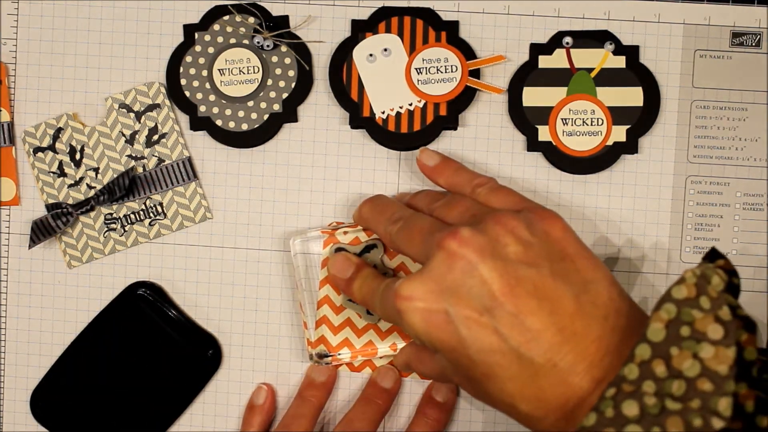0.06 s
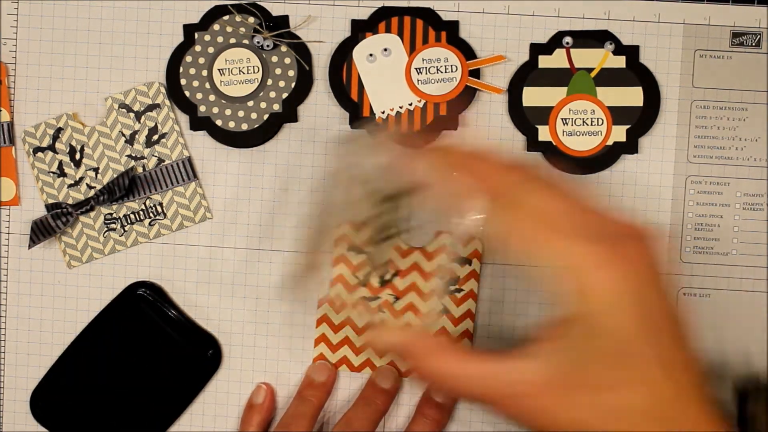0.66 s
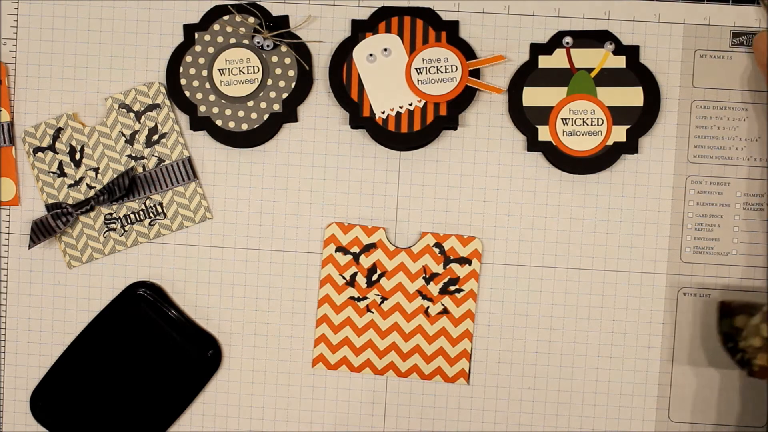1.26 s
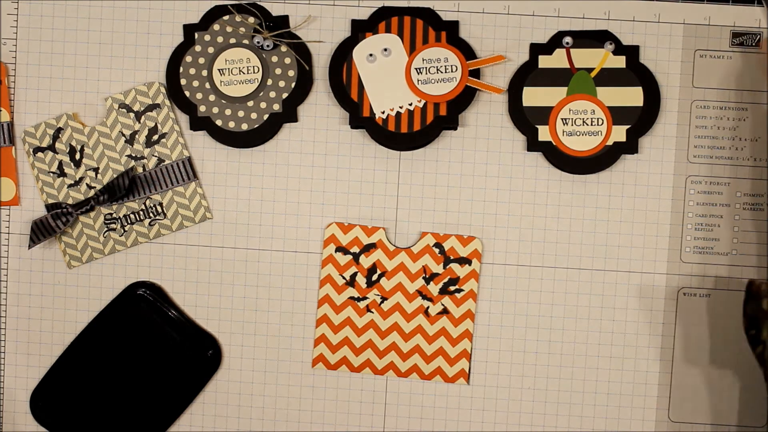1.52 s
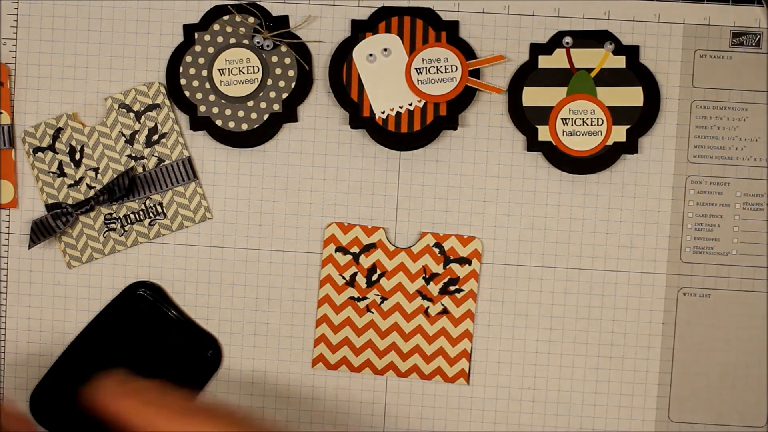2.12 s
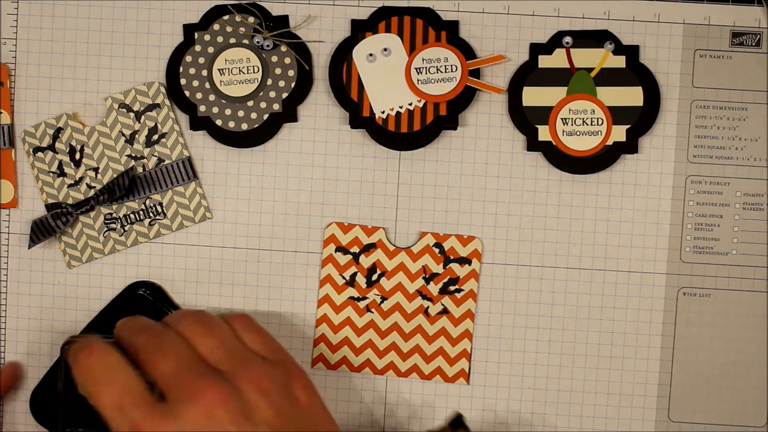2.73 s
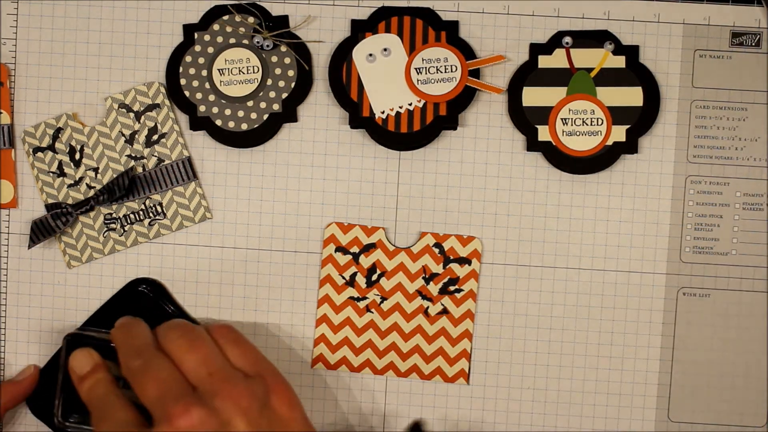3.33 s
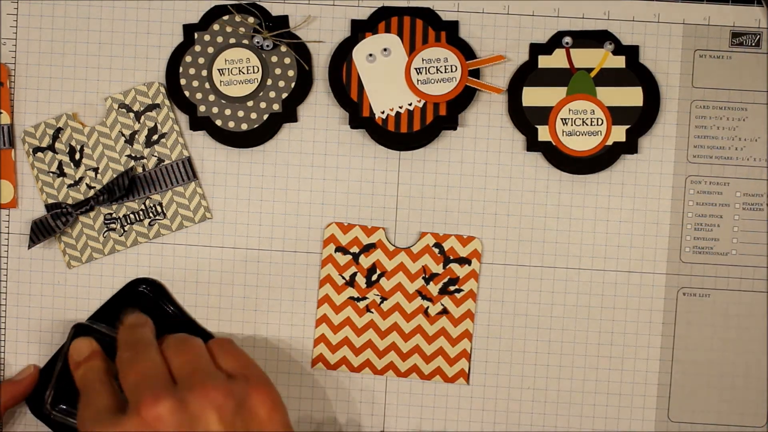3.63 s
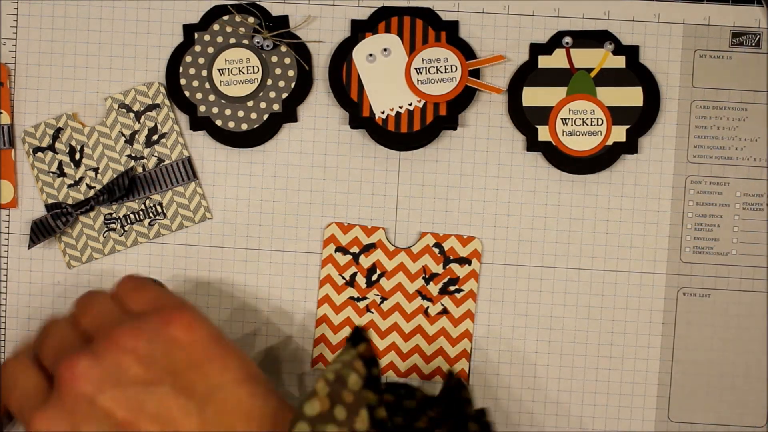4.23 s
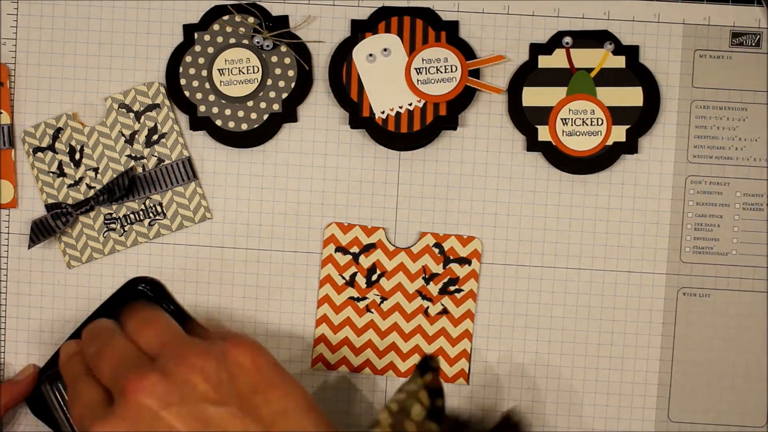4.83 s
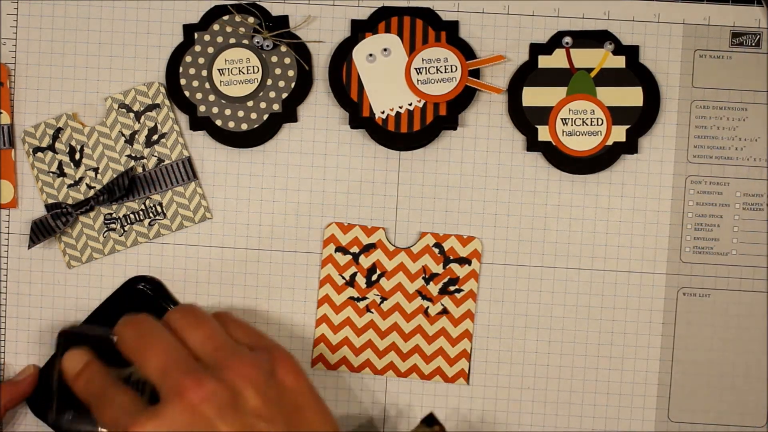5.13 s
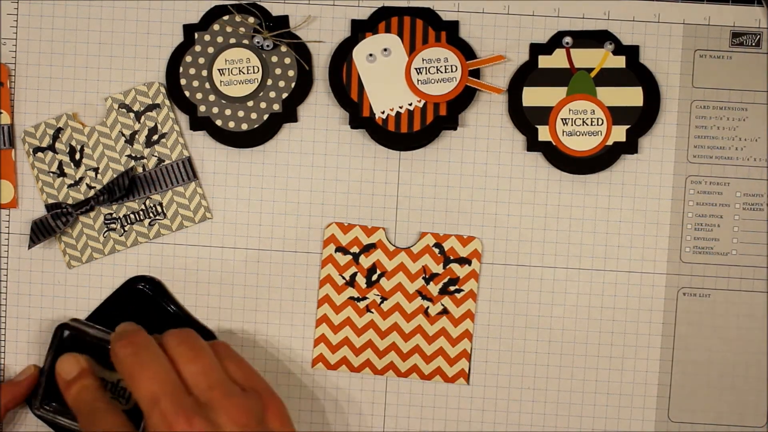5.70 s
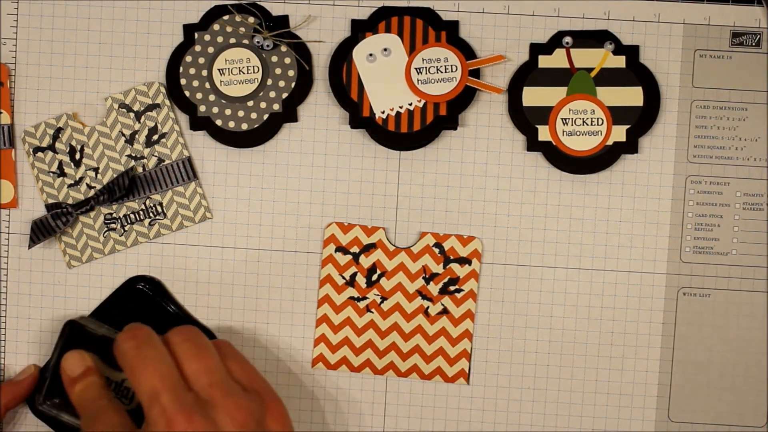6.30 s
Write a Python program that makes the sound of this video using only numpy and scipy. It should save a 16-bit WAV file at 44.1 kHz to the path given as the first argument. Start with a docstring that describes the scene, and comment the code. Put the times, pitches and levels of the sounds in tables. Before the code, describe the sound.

A hard acrylic block clatters sharply onto a desk, then taps several times on a plastic ink pad case, up close.

```python
"""Stamping at a craft desk

Up close, an acrylic stamp block is set down and clatters, then is tapped on a plastic ink-pad case.
Every blow rings the piece and thuds the desk; hands, sleeve and paper rustle. A small room answers,
and the recorder's limiter ducks the hiss after the hardest clack."""
import sys
import numpy as np
from scipy import signal
from scipy.fft import rfft, irfft, next_fast_len
from scipy.io import wavfile
from scipy.ndimage import uniform_filter1d, minimum_filter1d

SR = 44100
rng = np.random.default_rng(int(sys.argv[2]) if len(sys.argv) > 2 else 0)


def materialize(psi):
    """Save the field psi as 16-bit PCM at rate SR to the path in sys.argv[1].

    A 1-D psi becomes a single channel; in a 2-D psi each row is a channel.
    """
    bounded = np.clip(np.atleast_2d(psi).T, -1, 1)
    quanta = np.round(bounded * 32767).astype(np.int16)
    wavfile.write(sys.argv[1], SR, quanta)


N = 280364
RING_SAMPLES = 16384
TIME, AGE = np.arange(N) / SR, np.arange(RING_SAMPLES) / SR  # seconds into the scene, into one ring

# The block lands and clatters: start_s, thud_db, body_db, clack_db, softness_db_per_octave
BLOCK_LANDINGS = [(1.1523, -32, -19.5, -27.5, 6.5), (1.2492, -42.5, -24, -33, 7.5),
                  (1.385, -38, -23.5, -23, 5.8), (1.4193, -33.5, -11.5, -14.5, 3.2),
                  (1.4258, -27.5, -14.5, -10.5, 9), (1.4312, -30, -22, -15.5, 9.5),
                  (1.871, -69, -49, -44.5, 17)]
# The acrylic's ringing tones: pitch_hz, level_db, t60_s
BLOCK_MODES = [(226, -6, 0.034), (314.4, -6.5, 0.16), (443.5, -5, 0.12), (481, 4.5, 0.05), (573, 2, 0.053),
               (604, -8, 0.2), (671, -8, 0.17), (776, -6, 0.12), (846, -21.5, 0.029), (1083, -4.5, 0.076),
               (1270, 5.5, 0.04), (1295, 6, 0.02), (1370, -4.5, 0.05), (1548, 5.5, 0.035),
               (1980, -23, .025), (2200, 5.5, .025), (3380, 19, 0.017), (3680, 3.5, .025), (6250, 5, .02)]
# Its crack, the crowd of damped modes between and above them: centre_hz, level_db, t60_s
BLOCK_CRACK_BANDS = [(201, -6, 0.043), (500, -2, 0.059), (1400, -1.5, 0.0071), (2640, -7.5, 0.064),
                     (3620, 8, 0.017), (4980, 3, 0.055), (6030, 8.5, 0.017), (9000, -1.5, 0.048),
                     (16000, 5.5, 0.011)]
def stamp_block():
    """The acrylic block lands on the desk with a bright, cracking clatter."""
    return knocks(BLOCK_LANDINGS, BLOCK_MODES, BLOCK_CRACK_BANDS, crack_db=7.5, tick_db=3.5,
                  scatter_db=-13, sway_db=-11.5, lead_s=0.0026, graze_db=-31)


# Taps on the case: start_s, thud_db, body_db, clack_db, softness_db_per_octave
CASE_TAPS = [(2.8205, -43, -44, -49.5, 14), (3.035, -49, -39.5, -44, 13), (3.1022, -27.5, -28, -27.5, 6),
             (3.755, -51.5, -53.5, -72, 10), (4.462, -42, -43.5, -53, 16), (5.546, -19.5, -26, -33.5, 7),
             (5.7585, -24.5, -37.5, -37.5, 10), (6.1615, -38, -45.5, -52, 18)]
# The plastic's ringing tones: pitch_hz, level_db, t60_s
CASE_MODES = [(235, -2.5, 0.058), (303, -6, 0.061), (407, -0.5, 0.053), (475, 4, 0.042), (500, -22, 0.016),
              (672, -7, 0.041), (778, -13, 0.071), (1186, -24, 0.14), (1646, 6, 0.027), (1690, 1, 0.061),
              (1870, -7, 0.043), (2080, -5.5, 0.039), (3020, -4.5, 0.027)]
# Its duller crack: centre_hz, level_db, t60_s
CASE_CRACK_BANDS = [(191, 7, 0.072), (500, 1.5, 0.05), (650, -3.5, 0.097), (1100, -6, 0.062),
                    (1700, 0.5, 0.086), (2400, 3.5, 0.02), (3420, -5, 0.049), (4100, -4.5, 0.053),
                    (4820, 0.5, 0.035), (7840, -26, 0.049), (16100, -36, 0.03)]
def ink_pad_case():
    """The block taps the plastic case, ringing it and rocking the desk below."""
    return knocks(CASE_TAPS, CASE_MODES, CASE_CRACK_BANDS, crack_db=-1, tick_db=-5.5,
                  scatter_db=-12, sway_db=0.5, lead_s=0.00221, graze_db=-20.5)


def knocks(hits, modes, crack, crack_db, tick_db, scatter_db, sway_db, lead_s, graze_db):
    """Each blow rings the piece and shakes the desk; one edge grazes just before the face lands."""
    out = np.zeros(N)
    for start_s, thud_db, body_db, clack_db, softness in hits:
        strike = blow(modes, crack, crack_db, tick_db, scatter_db)
        add(out, start_s, contact_tone(strike, body_db, clack_db, softness))
        graze = band(dense_ring(crack), 210, 2500, order=2)
        add(out, start_s - lead_s, at_onset_level(graze, body_db + graze_db))
        add(out, start_s - lead_s / 2, at_onset_level(desk_thud(sway_db), thud_db))
    return out


def blow(modes, crack, crack_db, tick_db, scatter_db):
    """A struck piece rings; its crack, contact tick and scatter are balanced against that ring."""
    ring, dense = modal_ring(modes), dense_ring(crack)
    tick = colour(1. * (AGE == 0), crack)
    scatter = colour(room_tail(), crack)  # the crack flies off and comes back as a smooth wash
    layers = [(ring, 0), (dense, crack_db), (tick, tick_db), (scatter, scatter_db)]
    return band(sum(at_onset_level(layer, db) for layer, db in layers), 140, SR / 2, order=2)


# A blow's body, clack and two treble bands: low_hz, high_hz
TONE_BANDS = [(200, 900), (900, 3000), (3000, 7000), (7000, 16000)]
def contact_tone(x, body_db, clack_db, softness):
    """The softer the contact, the faster the treble falls away above the clack."""
    centres_hz = np.sqrt(np.prod(TONE_BANDS, axis=1))
    octaves_up = np.log2(centres_hz[1:] / centres_hz[1])
    target_db = np.array([body_db, *(clack_db - softness * octaves_up)])
    for _ in range(2):  # neighbouring bands overlap, so shape twice
        band_db = 20 * np.log10([onset_rms(band(x, *edges)) for edges in TONE_BANDS])
        x = colour(x, list(zip(centres_hz, target_db - band_db)))
    return x


def modal_ring(modes, detune=0.013, in_step_hz=900):
    """Damped modes; the low ones start in step, higher ones take their sign from the point of contact."""
    out = np.zeros(RING_SAMPLES)
    for pitch_hz, level_db, t60_s in modes:
        strength, mistuning, side = rng.standard_normal(3)
        polarity = -1 if pitch_hz < in_step_hz else np.sign(side)
        tone = np.sin(2 * np.pi * pitch_hz * (1 + detune * mistuning) * AGE)
        out += polarity * undb(level_db + 2 * strength) * fade(t60_s) * tone
    return out


def dense_ring(table, band_count=14):
    """Countless overlapping modes: noise that dies at its own pace in each band."""
    edges_hz = np.geomspace(150, SR / 2, band_count + 1)
    hz = np.fft.rfftfreq(RING_SAMPLES, 1 / SR)
    white = rfft(rng.standard_normal(RING_SAMPLES))
    out = np.zeros(RING_SAMPLES)
    for low_hz, high_hz in zip(edges_hz, edges_hz[1:]):
        centre_hz = np.sqrt(low_hz * high_hz)
        wash = irfft(white * ((hz >= low_hz) & (hz < high_hz)))
        out += wash * undb(across(centre_hz, table)) * fade(across(centre_hz, table, column=2))
    return out


# The desk's low weight: pitch_hz, level_db, t60_s
DESK_MODES = [(59.4, 3, 0.2), (89, 3, 0.084), (123.2, 2, 0.14), (152.7, -10, 0.08)]
def desk_thud(sway_db=0, push_s=0.0016):
    """The desk top dips under a short push and swings back; sway_db weights its lowest mode."""
    swing = sum(undb(level_db + sway_db * (k == 0)) * fade(t60_s) * np.cos(2 * np.pi * pitch_hz * AGE)
                for k, (pitch_hz, level_db, t60_s) in enumerate(DESK_MODES))
    push = AGE / push_s * np.exp(-2 * AGE / push_s)
    return -band(signal.fftconvolve(swing, push)[:RING_SAMPLES], 71, 390, order=2)


# Soft bumps of hand and block: start_s, thud_db, boom_db, case_body_db
SOFT_BUMPS = [(1.826, -56, -76, -61), (2.669, -67, -51.5, -82), (2.8, -37.5, -44.5, -53),
              (3.891, -45.5, -49.5, -61), (3.978, -55.5, -42, -71), (5.047, -51, -31.5, -48),
              (5.962, -44, -44.5, -67)]
def bumps(boom_hz=128, boom_t60_s=0.17, press_s=0.00086):
    """Cushioned contacts wake only the desk, its hollow middle and the lowest modes of the case."""
    out = np.zeros(N)
    boom = np.sin(2 * np.pi * boom_hz * AGE) * fade(boom_t60_s) * (1 - np.exp(-AGE / press_s))
    for start_s, thud_db, boom_db, case_body_db in SOFT_BUMPS:
        body = band(modal_ring(CASE_MODES), 200, 515, order=2)
        desk = at_onset_level(desk_thud(), thud_db) + at_onset_level(boom, boom_db)
        add(out, start_s, desk + at_onset_level(body, case_body_db))
    return out


# Card and block scraping: peak_s, half_length_s, level_db, lower_hz, upper_hz, lower_db, fizz_db
EDGE_SCRAPES = [(0.9976, 0.0048, -39, 1860, 3300, -9.5, -2), (1.009, 0.0032, -40.5, 1900, 3250, -5, -14),
                (3.269, 0.0029, -53, 1760, 5200, 15, -14), (3.593, 0.0017, -43, 1700, 4870, 14, -31),
                (5.18, 0.029, -60.5, 1700, 4430, -1, 1), (5.212, 0.014, -58.5, 1700, 4470, 10, -6),
                (5.296, 0.018, -58.5, 1700, 4630, -13, -2)]
def scrapes(relative_width=0.1):
    """An edge dragged over the paper: dense slips ring two resonances of the piece."""
    out = np.zeros(N)
    for peak_s, half_length_s, level_db, lower_hz, upper_hz, lower_db, fizz_db in EDGE_SCRAPES:
        slips = friction(grain_db=3.5)
        lower, upper = (band(slips, hz * (1 - relative_width / 2), hz * (1 + relative_width / 2), order=1)
                        for hz in (lower_hz, upper_hz))
        fizz = band(slips, 2500, 15400, order=2)
        scrape = at_level(lower, lower_db) + at_level(upper, 0) + at_level(fizz, fizz_db)
        out += at_level(scrape, level_db) * stroke(peak_s, half_length_s)
    return out


# Brief brushes on paper: peak_s, half_length_s, level_db, low_hz, high_hz
FINGER_RUBS = [(0.5, 0.046, -60, 50, 1570), (0.792, 0.0072, -42, 493, 2000),
               (4.767, 0.047, -62.5, 300, 500), (4.855, 0.076, -66.5, 90, 170), (5.2, 0.028, -53, 60, 517),
               (5.292, 0.014, -52, 120, 1870), (5.456, 0.039, -58.5, 90, 483),
               (5.485, 0.013, -57, 1170, 1400)]
def paper_rubs(min_width_hz=100):
    """Fingers slide over the paper, each rub a swell of grainy noise."""
    out = np.zeros(N)
    for peak_s, half_length_s, level_db, low_hz, high_hz in FINGER_RUBS:
        rub = band(friction(grain_db=2.5), low_hz, max(high_hz, low_hz + min_width_hz))
        out += at_level(rub, level_db) * stroke(peak_s, half_length_s)
    return out


# Pinpoint handling detail: start_s, level_db
NAIL_AND_INK_TICKS = [(.505, -65), (1.03, -62), (1.322, -68), (1.509, -62), (2.785, -63.5), (3.279, -66),
                      (3.297, -64), (3.657, -72), (5.704, -68), (5.911, -67), (6.111, -66), (6.315, -63.5)]
def ticks(t60_s=0.03):
    """Fingernails and tacky ink make tiny bright snaps."""
    out = np.zeros(N)
    for start_s, level_db in NAIL_AND_INK_TICKS:
        snap = band(rng.standard_normal(RING_SAMPLES) * fade(t60_s), 4050, 14700, order=1)
        add(out, start_s, at_onset_level(snap, level_db))
    return out


# The cloth's soft tone: frequency_hz, gain_db
SLEEVE_EQ = [(100, -4), (400, -3), (1200, -1.5), (2500, -4), (5000, -9), (12000, -20.5)]
# The arm reaches or draws back: peak_s, half_length_s, level_db
SLEEVE_SWISHES = [(0.553, 0.088, -64), (.89, 0.23, -62), (1.3, 0.27, -58), (1.81, 0.29, -61),
                  (2.693, 0.22, -59.5), (3.51, 0.074, -64), (5.35, 0.28, -65)]
def sleeve(rest_db=-65.5):
    """Each arm movement swishes the cloth, which stirs faintly even at rest."""
    cloth = colour(friction(grain_db=1.5), SLEEVE_EQ)
    swish_power = sum((undb(level_db) * stroke(peak_s, half_length_s)) ** 2
                      for peak_s, half_length_s, level_db in SLEEVE_SWISHES)
    return cloth / rms(cloth) * np.sqrt(undb(rest_db) ** 2 + swish_power)


def friction(grain_db, grain_samples=40):
    """Fibres catching and letting go: noise whose strength jumps about every millisecond."""
    white = rng.standard_normal(N)
    grip = np.repeat(rng.standard_normal(N // grain_samples + 1), grain_samples)[:N]
    return white * undb(grain_db * grip)


def stroke(peak_s, half_length_s):
    """Speed of a short slide, swelling to its peak and easing off."""
    return 1 / np.cosh(np.clip((TIME - peak_s) / half_length_s, -20, 20)) ** 1.37


# The small room's short tail: centre_hz, level_db, t60_s
ROOM_DECAY = [(98, -8.5, 0.39), (300, 2.5, 0.27), (700, 3.5, 0.25), (2000, -4, 0.26), (4420, -7, 0.28),
              (8970, -13, 0.29), (15570, -7, .1)]
def room_tail(build_s=0.0055):
    """Nearby walls: their answer builds up just after the direct sound."""
    return dense_ring(ROOM_DECAY) * (1 - np.exp(-(AGE / build_s) ** 2))


def room(x, wet_db):
    """The direct sound plus its ring in the room, with wet_db set in the midrange."""
    tail = room_tail()
    midrange_gain = np.abs(rfft(tail))[100:1000].mean()  # about 270-2700 Hz
    return x + undb(wet_db) * signal.fftconvolve(x, tail / midrange_gain)[:N]


# Bass-heavy hiss: frequency_hz, gain_db
HISS_EQ = [(15, -40), (25, -14), (59, 3.5), (82, -3.5), (130, -2), (255, -11), (361, -8.5), (500, -12.5),
           (557, -14), (1010, -12.5), (1730, -20), (2890, -19), (9460, -24.5), (12400, -21.5), (15800, -22)]
# Low hum: pitch_hz, level_db
HUM_TONES = [(59.5, -79), (123.8, -72.5)]
# High whine: centre_hz, width_hz, level_db
WHINE_BANDS = [(11890, 350, -78.5), (12860, 300, -78)]
def background(hiss_db=-60.5):
    """Steady hiss with a faint hum and two thin bands of electronic whine."""
    out = at_level(colour(rng.standard_normal(N), HISS_EQ), hiss_db)
    for pitch_hz, level_db in HUM_TONES:
        out += undb(level_db) * np.sqrt(2) * np.sin(2 * np.pi * (pitch_hz * TIME + rng.random()))
    for centre_hz, width_hz, level_db in WHINE_BANDS:
        whine = band(rng.standard_normal(N), centre_hz - width_hz / 2, centre_hz + width_hz / 2, order=2)
        out += at_level(whine, level_db)
    return out


def limiter(x, ceiling_db=-10, hold_s=0.13, release_db_per_s=45):
    """The gain drops at once on a peak, holds, then creeps back."""
    level_db = 10 * np.log10(np.maximum(uniform_filter1d(x ** 2, size=88), 1e-12))
    hold_samples = 2 * int(hold_s * SR / 2) + 1
    held_db = minimum_filter1d(np.minimum(ceiling_db - level_db, 0), hold_samples, origin=hold_samples // 2)
    climb_db = release_db_per_s * TIME
    gain_db = np.minimum.accumulate(held_db - climb_db) + climb_db
    return x * undb(uniform_filter1d(gain_db, size=22))


def undb(db):
    """Decibels to gain."""
    return 10 ** (np.asarray(db) / 20)


def rms(x):
    """Root mean square."""
    return np.sqrt(np.mean(x ** 2)) + 1e-12


def onset_rms(x):
    """Strength of a blow over its first 25 ms."""
    return rms(x[:1102])


def at_level(x, db):
    """Set a sustained sound's rms level."""
    return undb(db) * x / rms(x)


def at_onset_level(x, db):
    """Set a blow's level by its attack."""
    return undb(db) * x / onset_rms(x)


def fade(t60_s):
    """Exponential decay, 60 dB down after t60_s."""
    return np.exp(-np.log(1000) * AGE / t60_s)


def add(out, start_s, x):
    """Mix x into out from start_s."""
    i = int(start_s * SR)
    out[i:i + len(x)] += x[:len(out) - i]


def band(x, low_hz, high_hz, order=3):
    """Causal band-pass."""
    edges_hz = [low_hz, min(high_hz, SR / 2 - 1)]
    return signal.sosfilt(signal.butter(order, edges_hz, "band", fs=SR, output="sos"), x)


def across(hz, points, column=1):
    """Read a column of a table on a log-frequency axis."""
    table = np.array(points)
    return np.interp(np.log(hz + 1), np.log(table[:, 0]), table[:, column])


def colour(x, points):
    """Minimum-phase EQ through (frequency_hz, gain_db) points: attacks stay sharp."""
    size = 2 * next_fast_len(len(x))
    gain = undb(across(np.fft.rfftfreq(size, 1 / SR), points))
    cepstrum = irfft(np.log(gain))
    cepstrum[1:size // 2] *= 2
    cepstrum[size // 2 + 1:] = 0
    return irfft(rfft(x, size) * np.exp(rfft(cepstrum)))[:len(x)]


def scene():
    """Nearly dry blows up front, roomier handling behind them, hiss underneath."""
    clacks = stamp_block() + ink_pad_case()
    handling = ticks() + sleeve() + paper_rubs() + scrapes()
    blows = room(clacks + bumps(), wet_db=-21)
    return (blows + room(handling, wet_db=-9.5) + background())[None]


def record(dry, full_scale=0.58, top_hz=15800):
    """The recorder limits, rounds what still overshoots and cuts the top."""
    limited = limiter(dry[0])
    rounded = limited / (1 + (limited / full_scale) ** 6) ** (1 / 6)
    return signal.sosfilt(signal.ellip(10, .2, 70, top_hz, fs=SR, output="sos"), rounded)[None]


dry = scene()
out = record(dry)
materialize(out)
```